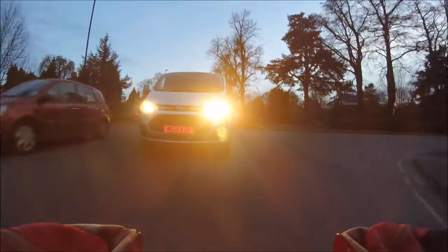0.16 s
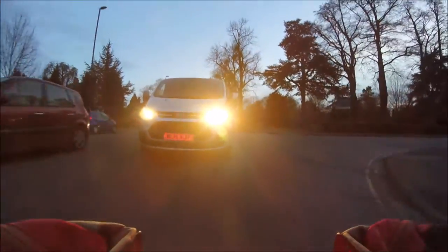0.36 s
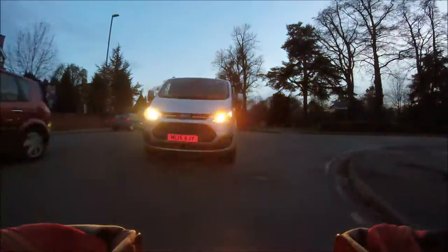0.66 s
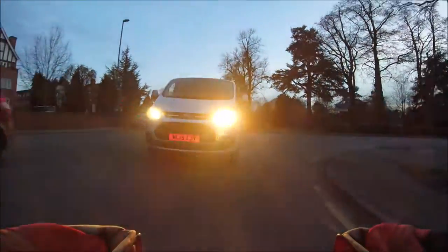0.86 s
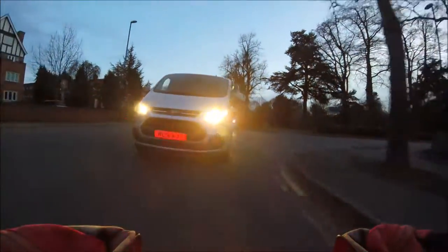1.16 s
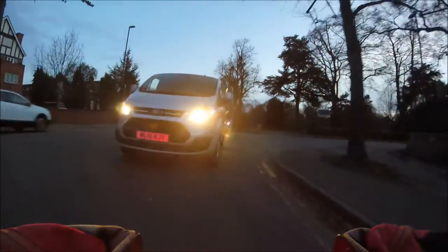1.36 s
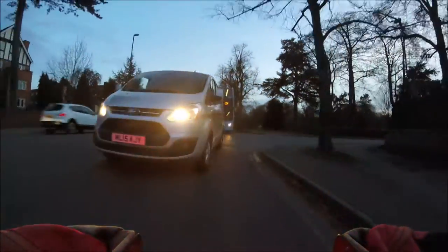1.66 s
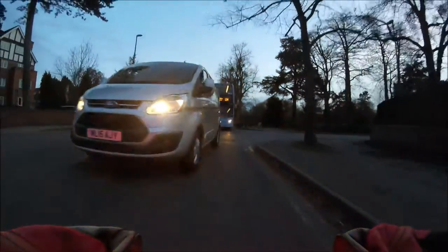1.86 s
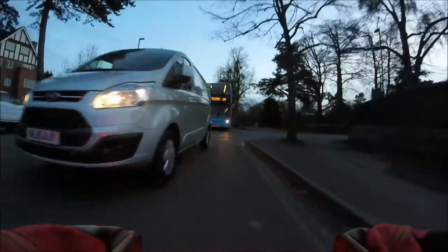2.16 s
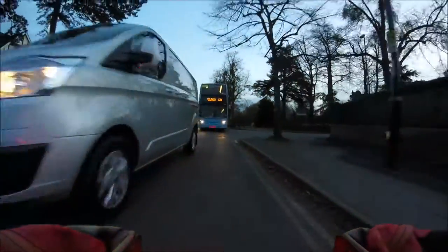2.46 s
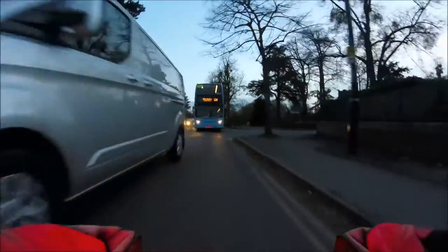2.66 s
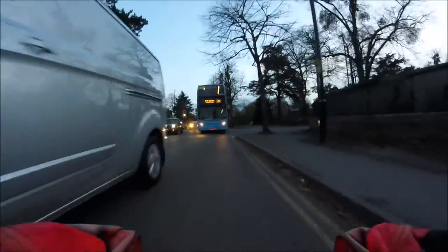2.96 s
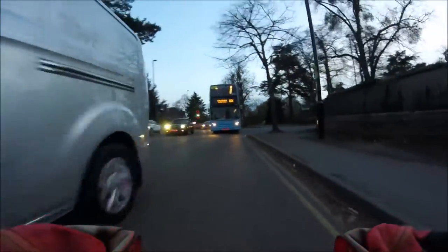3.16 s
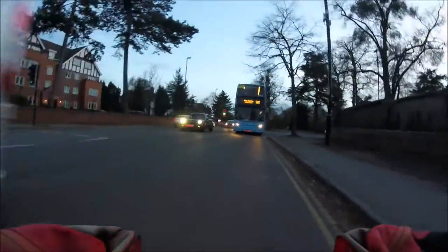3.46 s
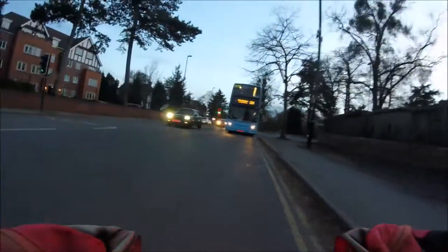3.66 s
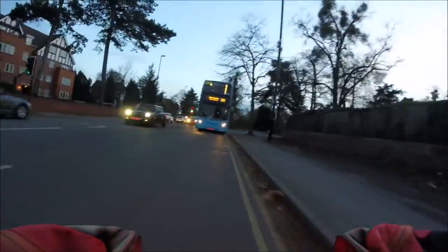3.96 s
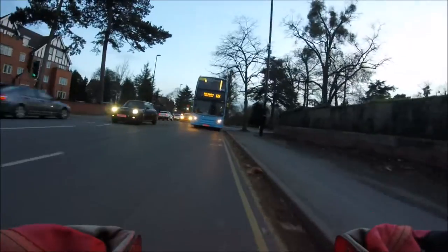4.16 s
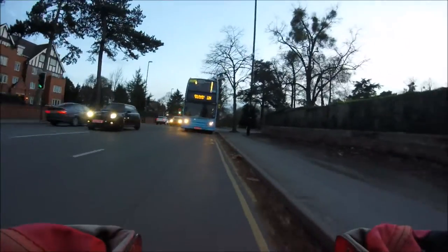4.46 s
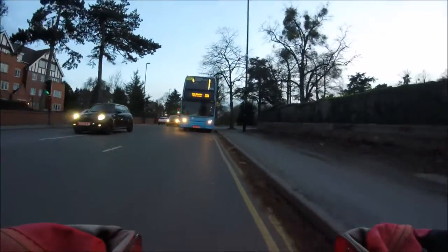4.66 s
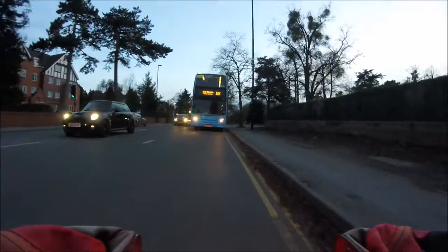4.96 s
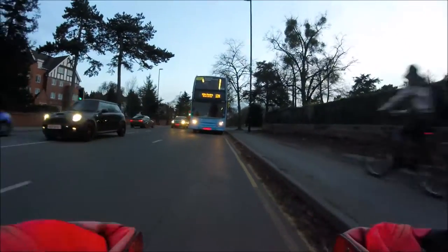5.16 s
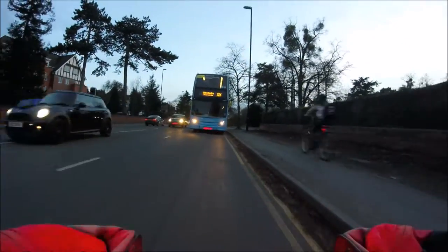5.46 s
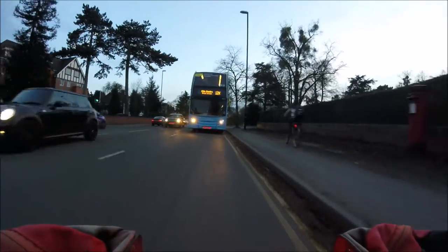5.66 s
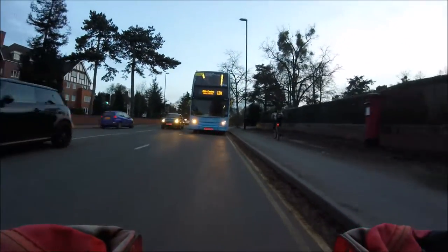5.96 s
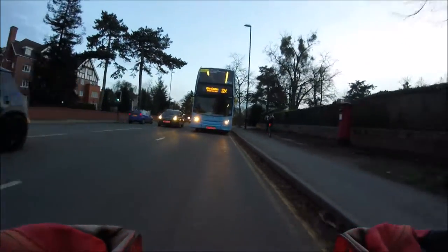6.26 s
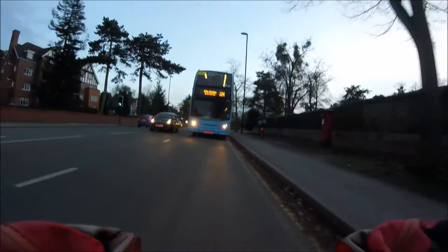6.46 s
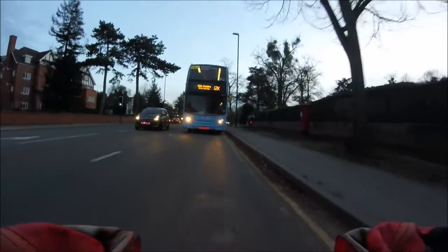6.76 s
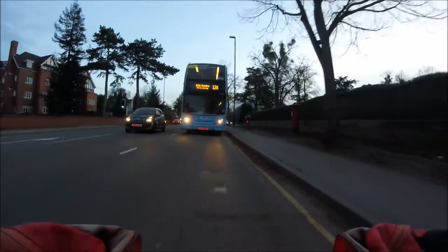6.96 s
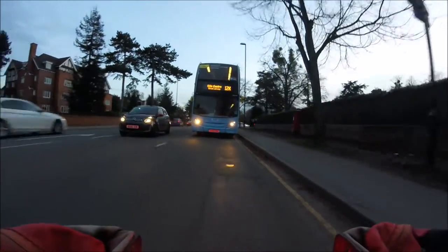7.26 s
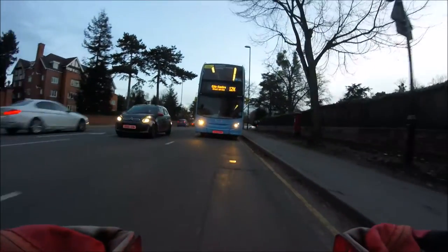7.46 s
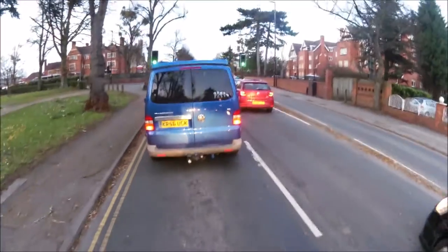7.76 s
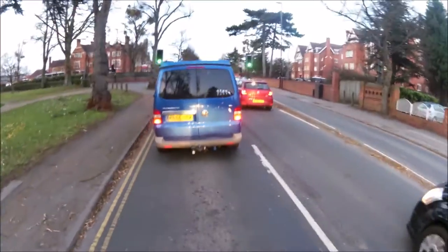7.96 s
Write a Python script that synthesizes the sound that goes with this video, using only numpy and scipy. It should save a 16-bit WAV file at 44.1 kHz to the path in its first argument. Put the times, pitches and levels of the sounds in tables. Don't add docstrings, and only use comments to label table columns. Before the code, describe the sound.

From 0 to 7.35 seconds a cased microphone on a bicycle hears mostly vibration through the frame. A loud boom near 70 Hz surges several times a second, with lumpy wheel and wind thuds beneath and a gritty drone, hum and dull buzz above, roughest in the first 0.3 seconds. Dry knocks with short rings strike around 0.1, 0.54, 1.18, 1.8, 2.8, 3.0, 4.05 and 4.8, with lighter taps between. Faint tyre hiss swells near 1.75, 2.6 and most at 3.7. From 6.5 to 6.9 chain ticks and loose parts rattle densely, hardest at 6.68; then the boom weakens. At 7.35 everything cuts to silence. At 7.59 a quieter, clearer street begins: broad tyre roar, a low van engine rising in pitch beside a higher car engine, and a very faint brake squeal near 7.4 kHz at 7.83 and 8.07, ending around 8.1.

```python
import sys
import numpy as np
from scipy import signal
from scipy.fft import rfft, irfft
from scipy.io import wavfile
from scipy.ndimage import uniform_filter1d

SR = 44100
rng = np.random.default_rng(int(sys.argv[2]) if len(sys.argv) > 2 else 0)


def rack_gain(trim_db):
    fader = np.asarray(trim_db, float)
    return 10 ** (fader / 20)


def generate_wav(sig):
    pcm = np.round(np.clip(np.atleast_2d(sig).T, -1, 1) * 32767).astype(np.int16)
    wavfile.write(sys.argv[1], SR, pcm)


N = 357210
CUT_S, RESUME_S = 7.348, 7.586


def rms_one(x):
    return x / np.sqrt(np.mean(x ** 2) + 1e-20)


def noise():
    return rng.standard_normal(N)


def in_time(rows):
    s, *columns = np.transpose(rows)
    return [np.interp(np.arange(N) / SR, s, c) for c in columns]


def swells(rows, rest_db):
    t = np.arange(0, N / SR + 0.01, 0.002)
    db = rest_db
    for s, peak_db, build, fade in rows:
        climb = (s - t) / max(build, 0.01)
        sink = (t - s) / max(fade, 0.01)
        db = np.maximum(db, peak_db - 10 * np.where(t < s, climb, sink))
    return np.interp(np.arange(N) / SR, t, db)


def drift(rate):
    r = np.exp(-2 * np.pi * rate / SR)
    wander = signal.lfilter([1], [1, -2 * r, r * r], rng.standard_normal(N + SR))
    return rms_one(wander[SR:])


def band(x, hz, kind, order=3):
    return signal.sosfilt(signal.butter(order, hz, kind, fs=SR, output="sos"), x)


def body(spectrum, modes, size=8192):
    hz = np.maximum(np.arange(size // 2 + 1) * SR / size, 1)
    corner_hz, corner_db = np.array(spectrum).T
    db = np.interp(np.log(hz), np.log(corner_hz), corner_db)
    for mid, width, gain_db in modes:
        db = db + gain_db / (1 + (2 * (hz - mid) / width) ** 2)
    cepstrum = irfft(np.log(rack_gain(db)), size)
    cepstrum[1:size // 2] *= 2
    cepstrum[size // 2 + 1:] = 0
    return irfft(np.exp(rfft(cepstrum)), size)[:size // 2]


def through(x, response):
    return signal.oaconvolve(x, response)[:N]


# [t/s of widest swing, level/dB, build of last 10 dB/s, fade by 10 dB/s]
MOUNT_SWINGS = [(0.032, -9.5, 0.3, 0.04), (0.176, -18.5, 2.5, -1), (0.343, -7.5, 0.1, 0.17),
                (0.469, -9, 0.3, 0.2), (0.796, -14.0, 0.095, 0.1), (0.9, -14.5, 0, 0),
                (0.986, -12.2, 0.13, 0.15), (1.105, -13, 0.06, 0.1), (1.179, -10.5, 0.17, 0.07),
                (1.345, -16, 0, 0.5), (1.415, -16, 0, -0.5), (1.55, -6, 0.08, 0.1),
                (1.774, -9.5, 0.08, 0.1), (1.844, -11, 0.1, 0.2), (1.995, -13.9, 0, -0.2),
                (2.105, -12, 0.27, -0.4), (2.237, -10.5, 0.1, 0.1), (2.325, -10.5, 0.1, 0.3),
                (2.522, -14, 0, -0.4), (2.666, -6, 0.065, 0.24), (2.961, -8, 0.13, 0.15),
                (3.199, -10, 0.1, 0.3), (3.312, -8.5, 0.1, 0.13), (3.474, -12, 0, 0),
                (3.6, -15.5, 0.2, -1.8), (3.684, -12.5, 0.1, -2.5), (3.777, -9.5, 0.14, 0.15),
                (3.895, -12.5, 0, 0.4), (4.127, -5.5, 0.127, 0.12), (4.284, -11.5, 0, 0),
                (4.464, -9.0, 0.1, 0.13), (4.606, -7, 0.1, 0.17), (4.825, -10.5, -0.2, 0),
                (4.905, -9.5, 0.09, 0.04), (5.045, -15, -0.1, -0.5), (5.2, -8.5, 0.16, 0.1),
                (5.4, -10, 0, 0), (5.496, -10, -0.13, 0.103), (5.671, -7, 0.15, 0.03),
                (5.921, -6.5, 0.15, 0.205), (6.074, -8.5, 0, 0.07), (6.216, -8.5, 0.091, 0.17),
                (6.372, -5.5, 0.084, 0.18), (6.651, -12.5, 0.1, 0.12), (6.858, -15.5, -0.3, 0.16),
                (6.94, -22, -0.5, 0.137), (7.058, -20.5, 0.2, -0.5), (7.176, -18, 0.1, 0),
                (7.248, -21, -0.2, -0.5), (7.323, -12.5, 0.06, 0.8)]


def mount(wander_hz, rough_db):
    phase = 2 * np.pi * np.cumsum(69.67 + wander_hz * drift(8.5)) / SR
    swing = np.sqrt(2) * np.cos(phase - phase[round(CUT_S * SR)] + 0.5) * rack_gain(1.0 * drift(24))
    skirt = rms_one(band(noise(), [52, 92], "band", order=2))
    return rack_gain(swells(MOUNT_SWINGS, -32)) * (swing + rack_gain(rough_db) * skirt)


# [t/s, level/dB, build of last 10 dB/s, fade by 10 dB/s]
WHEEL_JOLTS = [(.14, -22, -2, -0.1), (.305, -8.5, 0.2, 0), (.7, -17, -1.5, 0.4), (1.0, -12, 0, 0),
               (1.61, -12, -0.2, 0.04), (1.95, -20, -1.3, 0.5), (2.5, -18, 0, 0.3),
               (2.62, -10.5, 0.08, 0.13), (3.21, -21, -1, 0.5), (3.7, -19.5, 0.1, 0.2),
               (4.5, -29.5, 1.5, -10), (4.6, -26, 0, 1), (5.0, -30.5, -5, 3.5), (5.15, -20, 0.5, 0),
               (5.4, -29, -0.1, 0.5), (6.3, -23.5, 0.5, 0), (6.34, -15, 0.1, 0.3), (6.48, -8, 0.12, -0.04),
               (6.66, -10.5, 0, 0), (7.34, -32, -0.5, -0.5)]


def jolts():
    lumps = band(noise() * rack_gain(2.4 * drift(22)), [18, 48], "band", order=2)
    return rack_gain(swells(WHEEL_JOLTS, -43)) * rms_one(lumps)


# [f/Hz, level/dB per Hz]
CASE_SPECTRUM = [(60, -29), (130, -34.5), (220, -40), (350, -39), (600, -47.5), (950, -53.5), (1400, -56.5),
                 (2300, -59), (3300, -70.5), (4300, -68.5), (5100, -86), (6500, -70.5), (8000, -88),
                 (15000, -125)]
# [f/Hz, width/Hz, level/dB]
BODY_MODES = [(132.3, 7.3, 9.5), (306, 27, 5.5), (347.8, 26, 11.5), (422, 9.8, -1.5), (492, 17, 7.5),
              (698, 18, 4), (900, 300, -5), (1313, 110, 4), (1614, 146, 10), (1767, 110, -13.5),
              (2195, 320, 7), (2287, 62, 3), (2690, 100, 5), (3284, 243, 16.5),
              (3565, 180, -11), (4060, 700, 5), (4147, 100, -8.5), (4460, 65, -0.5), (4840, 49, -6.5),
               (5420, 120, 5.5), (5760, 180, 4), (6030, 140, -8), (6500, 190, 1.5), (6550, 290, -3),
               (6640, 230, -1), (8400, 550, -8), (9400, 600, 6)]


def frame_and_case():
    return body(CASE_SPECTRUM, BODY_MODES)


RANGE_EDGES = (95, 220, 900, 2450, 4900, 8200)
# [t/s, level/dB about the mean]
TARMAC_ROUGHNESS = [(0.0, 2.5), (.13, 7.5), (.28, 7.5), (.37, -1), (.68, 2.5), (.78, -1.5), (1.1, 5.5),
                    (1.22, -5), (2.12, -6), (2.56, -2), (3.02, -3.5), (3.9, 1), (4.19, -2.5), (5.36, 0),
                    (6.31, -0.5), (6.47, -7), (6.83, -12.5), (7.24, -4.5)]
# [t/s, level/dB]
DRONE_SWELLS = [(0.0, -40), (.32, -28), (.9, -27.5), (1.21, -32), (1.69, -30), (2.15, -30.5), (2.56, -25.5),
                (3.02, -28), (3.43, -32), (3.61, -23.5), (4.19, -25), (4.68, -23.5), (5.36, -23),
                (5.8, -24), (6.47, -33), (7.24, -35)]
# [t/s, level/dB, build of last 10 dB/s, fade by 10 dB/s]
FRAME_HUMS = [(0.06, -17, 0.15, 0.6), (0.26, -17.5, 0.5, 0.08), (0.555, -21, 0.24, 0.167),
              (0.704, -22, 0.54, 0.21), (1.006, -18.5, 0.135, 0.14), (1.1, -20.5, 0.3, 0.1),
              (1.189, -23.5, 0.152, 0.12), (1.401, -30, 0.3, -0.2), (1.511, -28.5, 0.159, 0.7),
              (1.814, -25, 0.24, 0.1), (1.942, -28, 0.5, 0.7), (2.081, -24.5, 0.03, 0),
              (2.389, -26, 0.4, 0.7), (2.674, -25.5, 0.4, 0), (2.832, -24, 0.176, 0.154),
              (3.007, -25.5, 0.3, 0.5), (3.287, -25.5, 0.401, 0.234), (3.456, -26, 0.463, 0.304),
              (3.63, -22.5, 0.1, 0.05), (3.785, -24.5, 0.1, 0.5), (3.921, -23.8, 0.1, 0.3),
              (4.079, -22.0, 0.17, -0.03), (4.256, -24.5, 0.234, 0.3), (4.446, -23, 0.2, 0),
              (4.576, -23.5, 0.2, 0.3), (4.721, -21.5, 0, 0.1), (4.863, -22.5, 0.1, 0.135),
              (4.987, -23, 0.1, 0.133), (5.18, -21.5, 0.139, 0.1), (5.408, -21.5, 0.2, 0.178),
              (5.507, -23, 0.6, 0.3), (5.617, -21.5, 0.2, 0.256), (5.747, -20.5, 0.07, 0.17),
              (5.871, -22.5, 0.5, 0.233), (6.04, -24.5, 0.149, 0.26), (6.15, -22.5, 0.05, 0.186),
              (6.24, -21.6, 0, 0.177), (6.547, -27.5, 0.3, 0.1), (6.687, -23, 0.04, 0.09),
              (6.866, -25, -0.02, 0.078), (7.172, -28.5, 0.3, 0.4), (7.287, -29, 0.212, 0.5)]


def road(frame, gritty_db, patchy_db):
    grit = rack_gain(np.clip(gritty_db * drift(90) + patchy_db * drift(12), -7, 3.5))
    shaken = through(noise() * grit, frame)
    drone_hz, hum_hz, buzz_hz, _, fizz_hz, _ = RANGE_EDGES
    rough_db, = in_time(TARMAC_ROUGHNESS)

    drone = band(shaken, [drone_hz, hum_hz], "band")
    hum = band(band(shaken, 1.135 * hum_hz, "high", order=6), 0.81 * buzz_hz, "low", order=2)
    buzz = band(band(shaken, 1.015 * buzz_hz, "high"), fizz_hz, "low", order=6)
    fizz = band(shaken, fizz_hz, "high", order=4)

    steadiness = 0.67
    hum = hum / uniform_filter1d(hum ** 2 + 1e-20, size=2600) ** (steadiness / 2)
    overtone_hz = 470
    overtones = rack_gain(-1.5 + 0.7 * rough_db) * band(hum, overtone_hz, "high")
    hum = band(hum, overtone_hz, "low") + overtones

    build_s, fade_s = 0.3, 0.37
    drone_db = swells([(s, db, build_s, fade_s) for s, db in DRONE_SWELLS], -37.5)
    hum_db = 1 + swells(FRAME_HUMS, -40)
    buzz_db = -36 + rough_db
    fizz_db = -56 + 0.65 * rough_db
    layers = [(drone_db, drone), (hum_db, hum), (buzz_db, buzz), (fizz_db, fizz)]
    return sum(rack_gain(db + 0.9 * drift(12)) * rms_one(layer) for db, layer in layers)


# [t/s, peak level/dB, brightness/dB, top/dB, rattle length/s]
HARD_KNOCKS = [(0.0877, -17.5, -1, -12.5, 0.022), (0.5292, -16.5, -11, -35, 0.018),
               (0.541, -7, -14, -48, 0.038), (0.6068, -14.5, -19, -35, 0.072),
               (1.149, -15, -8, -26.5, 0.044), (1.1715, -21, 8.5, -38, 0.015), (1.183, -8, 1, -36, 0.019),
               (1.659, -16.5, -9, -30, 0.017), (1.8095, -10, -5.5, -46.5, 0.039),
               (2.076, -16.5, -6.5, -33, 0.032), (2.8104, -14, -7, -53, 0.054),
               (2.825, -10.5, -2, -27, 0.017), (2.8722, -16.5, -8, -43, 0.061),
               (2.9945, -14, -4.5, -59, 0.045), (3.0188, -9.5, 0, -23.5, 0.032),
               (4.052, -11.5, -7.5, -30, 0.032), (4.764, -13.5, -16, -39, 0.028),
               (4.7915, -13, -1, -34, 0.03), (6.5415, -12.5, 1, -23, 0.03), (6.5984, -25, 3.5, -19, 0.044),
               (6.6473, -19, -5.5, -23, 0.036), (6.683, -5, -6, -29, 0.011), (6.838, -10, -7.5, -40, 0.026),
               (7.2064, -15, -5, -42, 0.022)]
# [t/s, peak level/dB]
LIGHT_TAPS = [(0.2974, -10.5), (0.465, -18.5), (0.5017, -20.5), (0.7434, -20), (1.0306, -17), (1.1002, -21),
              (1.7576, -19.5), (1.872, -19), (1.9195, -26), (2.066, -18.5), (2.132, -23), (1.828, -26),
              (2.3, -18), (2.5365, -18), (2.604, -25), (3.29, -20), (3.508, -19), (3.716, -18),
              (3.783, -22), (5.459, -16.5), (5.65, -19), (5.8, -18.5), (6.357, -20.5), (6.518, -21),
              (6.7575, -21), (7.1599, -23)]
# [t/s, peak level/dB, brightness/dB]
CHAIN_SLAPS = [(1.196, -21, -5), (1.2023, -15.5, -6), (4.7846, -22, -3.5), (6.6929, -11, -5),
               (6.7075, -16, -5), (6.7173, -19, -6), (6.7244, -21, -5), (6.7324, -27, -7),
               (6.7928, -30, -6), (6.8284, -12.5, -9), (6.845, -17, -7), (6.8525, -14, -3.5),
               (6.8595, -17, -8), (6.8676, -13.5, -1.5), (6.8757, -22, -5), (6.8867, -19.5, -4),
               (6.894, -27, -5)]
# [start t/s, length/s, level/dB, fade/dB]
LOOSE_CHATTERS = [
    (1.144, 0.062, -30.5, 1.5),
    (6.682, 0.051, -26.5, 5.5),
    (6.825, 0.071, -32.5, 2.5),
    (6.475, 0.024, -38, 0),
    (6.652, 0.019, -46, -16.5),
    (7.204, 0.023, -28, 13.5),
]


def knocks(frame):
    size = 4096
    age = np.arange(size) / SR
    hits = HARD_KNOCKS + [(s, db, -8.5, -30.5, 0.035) for s, db in LIGHT_TAPS]
    hits += [(s, db, bright_db, -31.5, 0.03) for s, db, bright_db in CHAIN_SLAPS]
    blows = np.zeros((4, N + size))
    for s, peak_db, bright_db, top_db, t60 in hits:
        decay = rack_gain(-60 * age / np.clip(t60, 0.004, 0.09))
        burst = rng.standard_normal(size) * decay * np.minimum(age / 0.0012, 1)
        levels_db = peak_db + np.array([[-2.5], [0], [bright_db], [top_db]])
        at = round(s * SR)
        blows[:, at:at + size] += rack_gain(levels_db) * burst / np.abs(burst).max()

    t = np.arange(N) / SR
    contacts = (rng.random(N) < 380 / SR) * rack_gain(1.5 * noise())
    slips = (0.31 + signal.lfilter([1], [1, -0.988], contacts + 1e-18)) * noise()
    strength = np.zeros(N)
    for s, length, db, fade_db in LOOSE_CHATTERS:
        strength += rack_gain(db - fade_db * (t - s) / length) * (t > s) * (t < s + length)
    blows[:, :N] += rack_gain([[-16], [0], [-5], [-32]]) * slips * strength

    _, _, buzz_hz, bright_hz, fizz_hz, air_hz = RANGE_EDGES
    tilted = band(frame, 550, "high", order=1)
    thud = band(tilted, [130, buzz_hz], "band", order=2)
    clack = band(frame, [buzz_hz, bright_hz], "band")
    click = band(band(frame, bright_hz, "high"), fizz_hz, "low", order=8)
    top = band(band(frame, fizz_hz, "high", order=6), air_hz, "low")
    out = np.zeros(N)
    for blow, path, db in zip(blows, (thud, clack, click, top), (7.1, 0.3, 2.2, 6.8)):
        out += rack_gain(db) * through(blow, path / np.sqrt(np.sum(path ** 2)))
    return out


# [t/s, f/Hz, peak level/dB, t60/s]
PART_RINGS = [(.541, 2630, -8, 0.025), (0.541, 640, -6.5, 0.052), (.6065, 7200, -38, 0.023),
              (1.153, 6330, -31, 0.047), (1.172, 2750, -5, 0.015), (1.184, 3350, -12.5, 0.018),
              (1.81, 2730, -5.5, 0.013), (1.811, 180, -2.5, 0.029), (2.068, 1080, -29, 0.04),
              (2.826, 7150, -38, 0.038), (3.018, 7220, -30, 0.021), (2.5, 748, -28.5, 0.055),
              (4.7918, 3986, -12, 0.021), (4.7918, 7350, -32.5, 0.016), (4.764, 700, -16.5, 0.03),
              (4.794, 950, -20, 0.029), (.552, 504, -13, 0.062), (1.186, 294, -7, 0.036),
              (4.793, 2880, -14, 0.022), (6.6838, 180, -3.5, 0.03), (6.696, 1577, -9.5, 0.067),
              (6.694, 2220, -11.5, 0.046), (1.81, 325, -14, .04), (3.018, 2180, -15.5, 0.041),
              (2.826, 1600, -18, 0.037), (2.827, 2220, -19, 0.068), (2.873, 1580, -20, 0.034),
              (3.018, 1600, -14.5, 0.046), (6.839, 3000, -15.5, 0.05), (6.829, 2400, -20.5, .04),
              (6.84, 2180, -18.5, .09), (7.5, 880, -15, 0.036), (6.862, 353, -25, .08),
              (6.868, 1570, -17.5, .06), (6.542, 2200, -14, 0.031), (6.6, 1600, -25.5, .04),
              (6.518, 1150, -18.5, 0.029), (4.7935, 2500, -15, 0.022), (4.792, 1550, -13.5, 0.027),
              (4.808, 3950, -30, .025), (6.542, 2750, -10.5, 0.019), (6.543, 1500, -18, .035),
              (6.6835, 2500, -9.5, .018), (6.867, 7500, -36, .02), (6.718, 7200, -36, .015),
              (6.697, 6900, -36.5, .02), (6.885, 2900, -20, .02), (1.183, 2200, -11, 0.018),
              (.553, 2100, -20.5, .03), (4.764, 1250, -17.5, .03), (3.018, 1034, -20.5, .04),
              (1.151, 2250, -17, .04), (1.81, 2150, -13, 0.024), (.609, 1620, -20.5, .035)]
# [t/s, peak level/dB, f/Hz]
SHELL_PINGS = [(1.144, -35.5, 5520), (1.147, -36, 6900), (4.5562, -33, 4050), (5.0416, -35, 4150),
               (5.1234, -34, 4200), (5.1826, -31.5, 4050), (0.1396, -39, 6490), (0.1534, -33, 6340),
               (0.2813, -38, 6480), (0.4554, -45, 6390), (0.4948, -39.5, 5680), (0.6614, -47, 6330),
               (0.7602, -45, 6420), (1.0989, -44, 6260), (1.6831, -47, 6450), (2.2583, -47, 6500),
               (2.2947, -47, 6430), (2.7082, -43, 6390), (3.9424, -44, 5620), (4.0307, -41, 6420),
               (4.0527, -38, 7130), (4.1133, -44, 6650), (4.6778, -43, 6970), (4.8988, -46, 5810),
               (4.9162, -44.5, 5400), (5.6451, -42, 5340), (5.6615, -41, 6410), (5.689, -43, 5330),
               (6.1379, -39, 6450), (6.1729, -41, 6380)]


def rings():
    size = 4096
    out, age = np.zeros(N + size), np.arange(size) / SR
    uneven = np.resize(rack_gain(2.5 * drift(170)), N + size)
    for s, hz, peak_db, t60 in PART_RINGS + [(s, hz, db, 0.018) for s, db, hz in SHELL_PINGS]:
        at = round(s * SR)
        envelope = rack_gain(peak_db - 60 * age / t60) * np.minimum(age / 0.0016, 1)
        out[at:at + size] += envelope * np.sin(2 * np.pi * hz * age) * uneven[at:at + size]
    return out[:N]


# [start t/s, end t/s, ticks per s, level/dB]
CHAIN_TICKS = [
    (6.481, 6.747, 700, -53),
    (6.746, 6.823, 120, -56),
    (6.825, 6.919, 350, -52.5),
]
# [t/s, peak level/dB]
CHAIN_SPITS = [(1.7426, -50.5), (1.5515, -54), (5.0391, -52.5), (4.411, -58), (6.0034, -57), (6.3496, -55),
               (0.6376, -56), (6.638, -43.5), (6.5537, -43), (6.889, -44), (5.6261, -48.5), (5.6498, -52),
               (5.7638, -50), (5.7857, -51.5), (5.8117, -49), (6.4804, -49.5), (6.4919, -37.5),
               (6.5097, -37.5), (6.5184, -45), (6.5245, -44), (6.544, -39), (6.5672, -45), (6.5744, -55),
               (6.5822, -44), (6.6014, -39.5), (6.6096, -37), (6.6174, -42), (6.623, -42), (6.6326, -45.5),
               (6.6425, -41), (6.6712, -38.5), (6.684, -37.5), (6.6954, -39.5), (6.718, -37.5),
               (6.7665, -51), (6.779, -48), (6.8084, -49), (6.852, -45), (6.8673, -37.5), (6.8954, -47.5),
               (6.9102, -50)]


def ticks():
    t, chance = np.arange(N) / SR, rng.random(N)
    clicks = np.zeros(N)
    for start, end, per_s, db in CHAIN_TICKS:
        clicks += rack_gain(db) * (chance < per_s / SR) * (t > start) * (t < end)
    clicks *= rack_gain(5.5 * noise())
    s, db = np.transpose(CHAIN_SPITS)
    clicks += np.bincount((s * SR).astype(int), rack_gain(db + 6.0), N)
    spits = signal.lfilter([1], [1, -0.96], clicks + 1e-18) * noise()
    return band(band(spits, 3800, "high", order=2), 9500, "low", order=3)


# [nearest t/s, hiss level/dB, build of last 10 dB/s, fade by 10 dB/s]
PASSING_CARS = [
    (.3, -77.5, 0.5, -1.7),
    (1.75, -66, 0.3, 0.5),
    (2.6, -64, 0.7, 1.0),
    (3.7, -61, 0.8, 0.27),
    (4.6, -76.5, 0, 0),
    (5.6, -73.5, 0, -0.5),
]


def passing():
    hiss = band(noise(), [7500, 8500], "band", order=1)
    hiss = band(band(hiss, 6000, "high"), 12500, "low", order=2)
    return rack_gain(swells(PASSING_CARS, -83.5) + 2.2 * drift(30)) * rms_one(hiss)


# [f/Hz, level/dB per Hz]
STREET_SPECTRUM = [(30, -45), (60, -9.5), (130, -10), (300, -6.5), (750, -5.5), (1300, -6), (2200, -11.5),
                   (3500, -22), (5500, -28.5), (8500, -41.5), (9500, -51.5), (13000, -64), (16000, -85.5)]
# [t/s, van firing f/Hz, van level/dB, car firing f/Hz, car level/dB]
ENGINES = [
    (7.6, 90.4, -39, 154.5, -45),
    (7.63, 90.5, -40, 147.7, -45.5),
    (7.9, 101.4, -48, 167.2, -41),
    (7.954, 114, -53, 167.3, -45),
    (8.1, 116, -42, 166, -48),
]
# [t/s, f/Hz, level/dB]
BRAKE_SQUEAL = [
    (7.8, 7400, -84),
    (7.83, 7400, -58),
    (7.87, 7400, -59),
    (8.03, 7100, -74),
    (8.07, 7300, -55),
    (8.1, 7400, -65),
]


def street():
    colour = body(STREET_SPECTRUM, [(800, 48, 5), (1163, 63, 4.0), (3260, 300, 5.5), (5850, 500, 2),
                                    (6770, 500, -4.5), (8300, 900, 4.5)])
    roar = rms_one(through(noise() * rack_gain(1.6 * drift(25)), colour))
    van_hz, van_db, car_hz, car_db = in_time(ENGINES)
    van_phase, car_phase = (2 * np.pi * np.cumsum(hz) / SR for hz in (van_hz, car_hz))
    van = rack_gain(van_db) * (np.sin(van_phase) + rack_gain(-10.0) * np.sin(van_phase / 2))
    car = rack_gain(car_db) * np.sin(car_phase)
    squeal_hz, squeal_db = in_time(BRAKE_SQUEAL)
    squeal_phase = 2 * np.pi * np.cumsum(squeal_hz + 60 * drift(40)) / SR
    squeal = np.sin(squeal_phase) * rack_gain(squeal_db + 3.9 * drift(60))
    mix = rack_gain(-30) * roar + np.sqrt(2) * (van + car) + squeal
    return band(mix, 12100, "low", order=20)


def scene():
    t = np.arange(N) / SR
    frame = frame_and_case()
    ride = mount(wander_hz=2.31, rough_db=-13) + jolts() + road(frame, gritty_db=2.0, patchy_db=1.5)
    ride = ride + knocks(frame) + rings() + ticks() + passing()
    ride = ride / (1 + ride ** 6) ** (1 / 6)
    fade_in = np.clip((t - RESUME_S) / 0.004, 0, 1)
    return (ride * (t < CUT_S) + street() * fade_in)[None]


def top_cut(x):
    return signal.sosfilt(signal.butter(12, 15800, fs=SR, output="sos"), x)


def record(dry):
    return top_cut(dry)


dry = scene()
out = record(dry)
generate_wav(out)
```